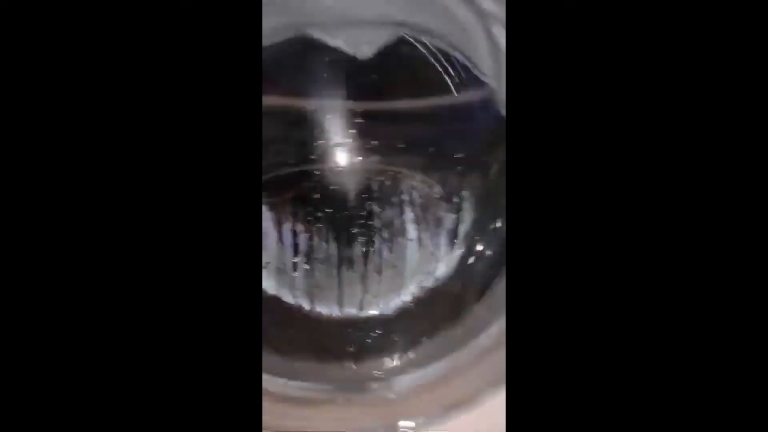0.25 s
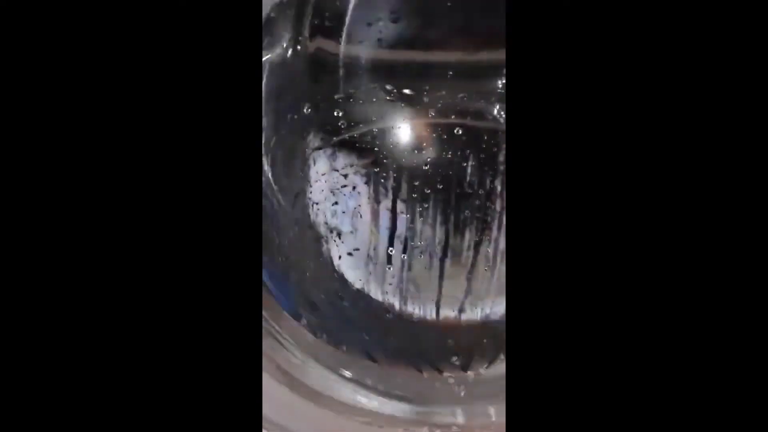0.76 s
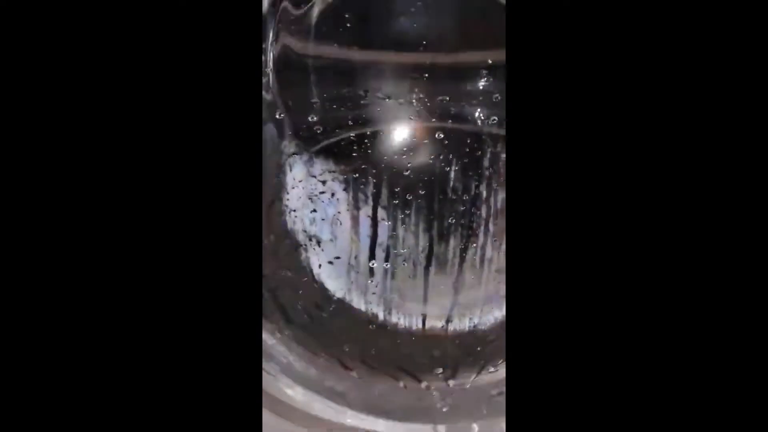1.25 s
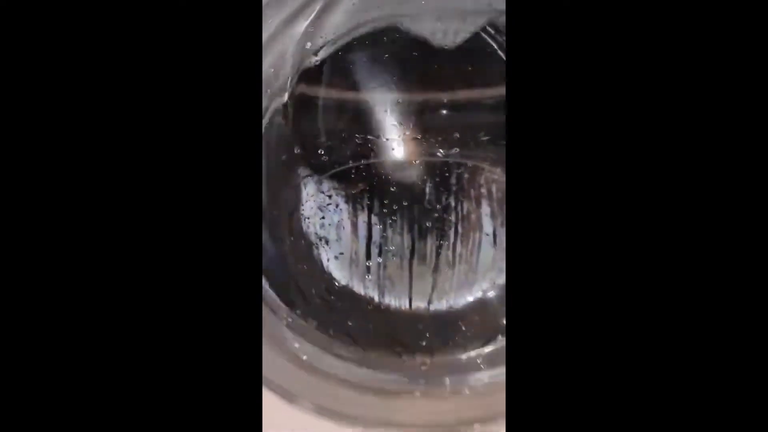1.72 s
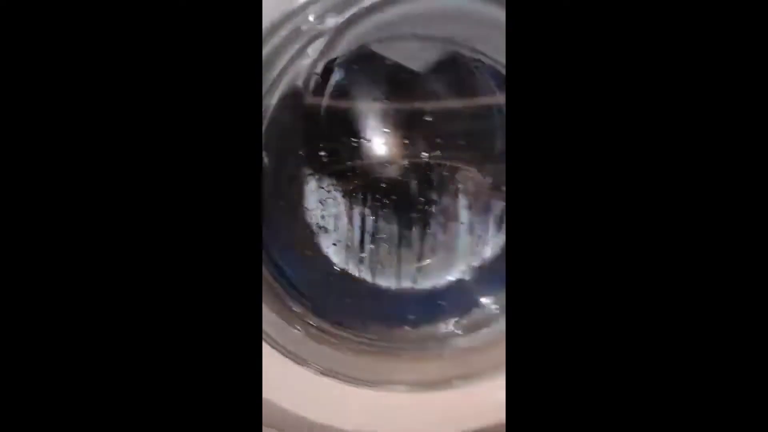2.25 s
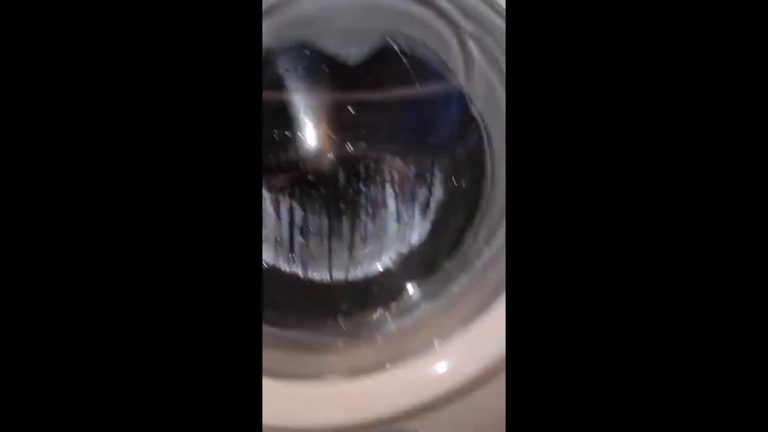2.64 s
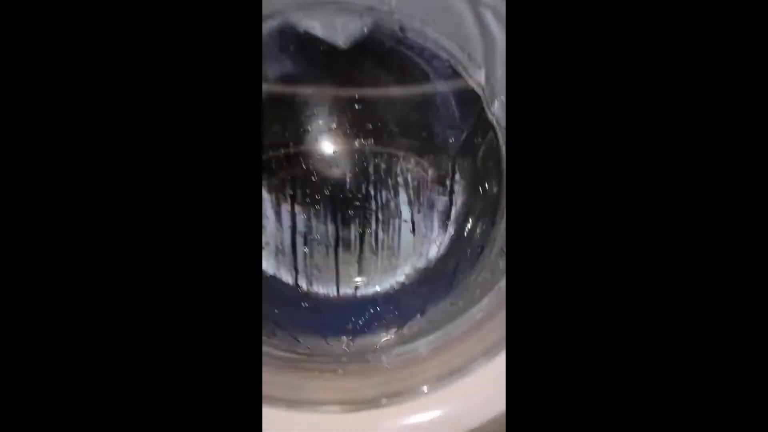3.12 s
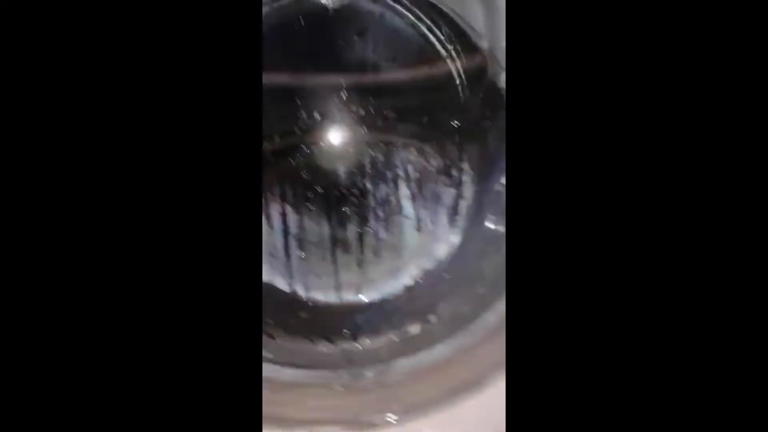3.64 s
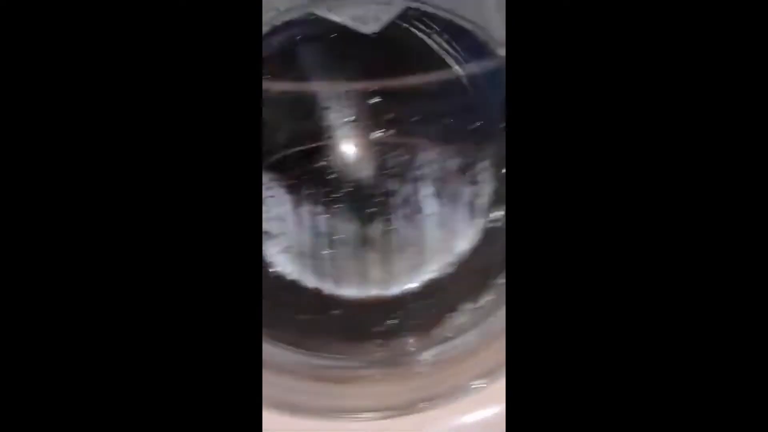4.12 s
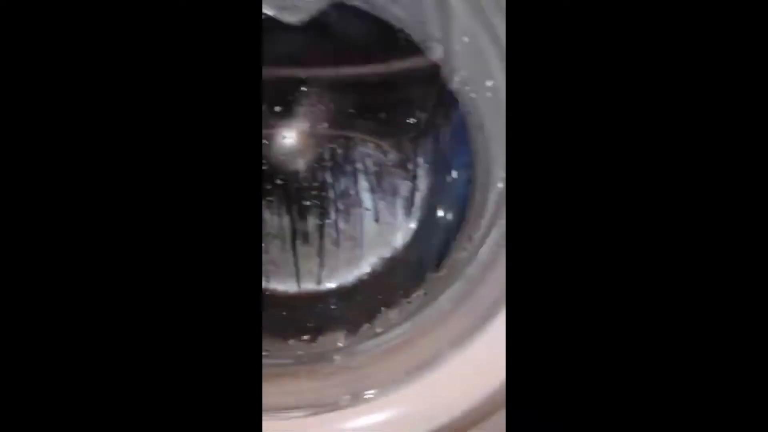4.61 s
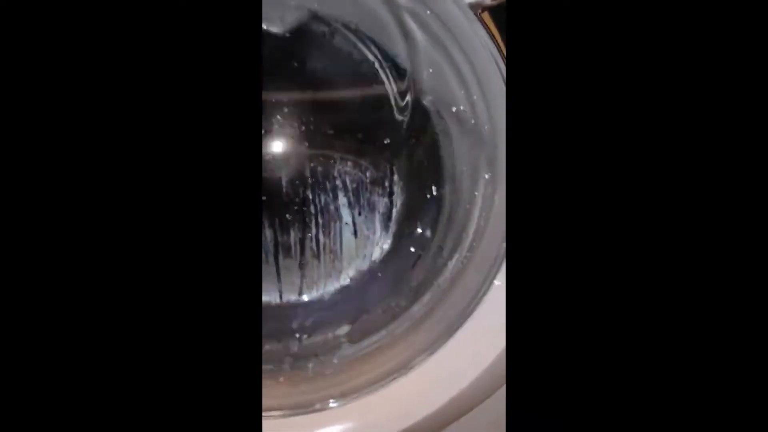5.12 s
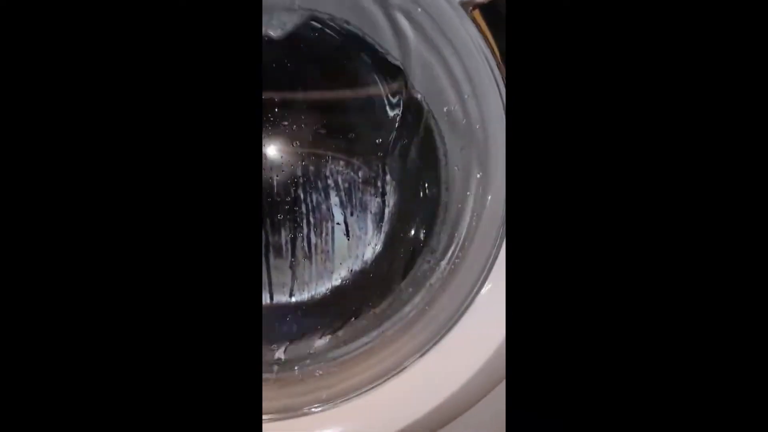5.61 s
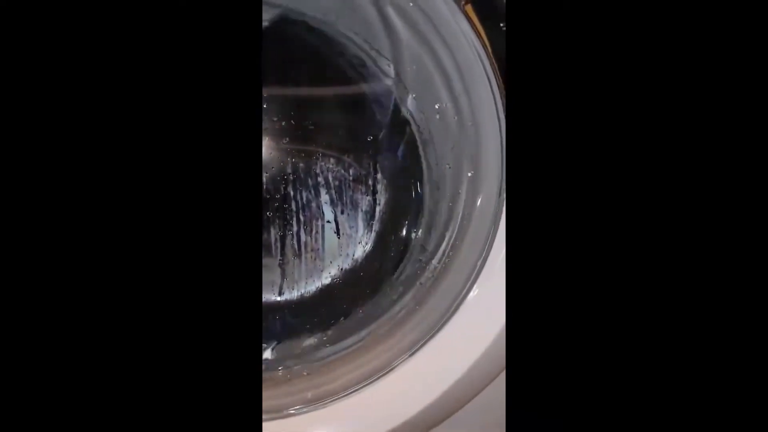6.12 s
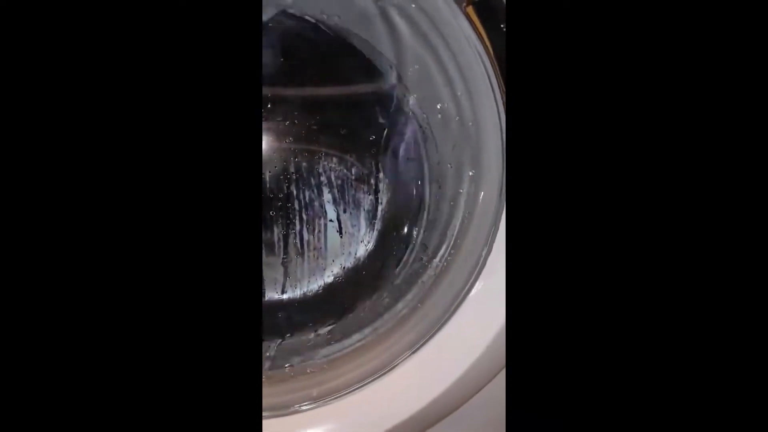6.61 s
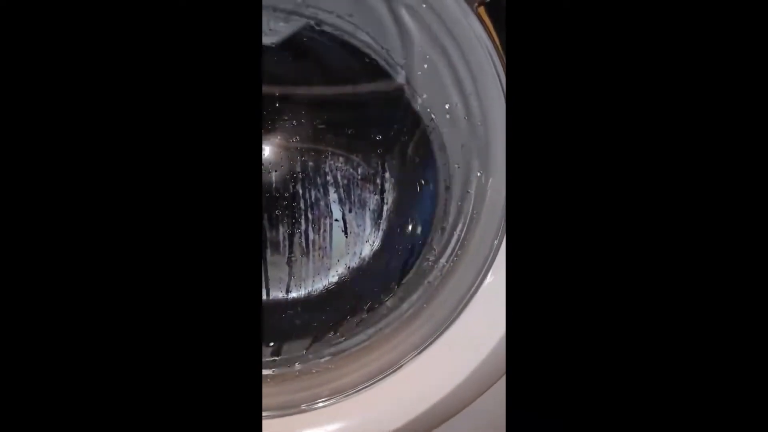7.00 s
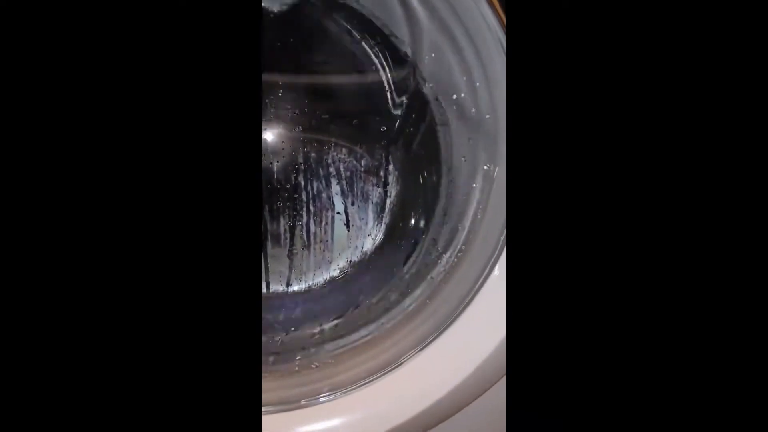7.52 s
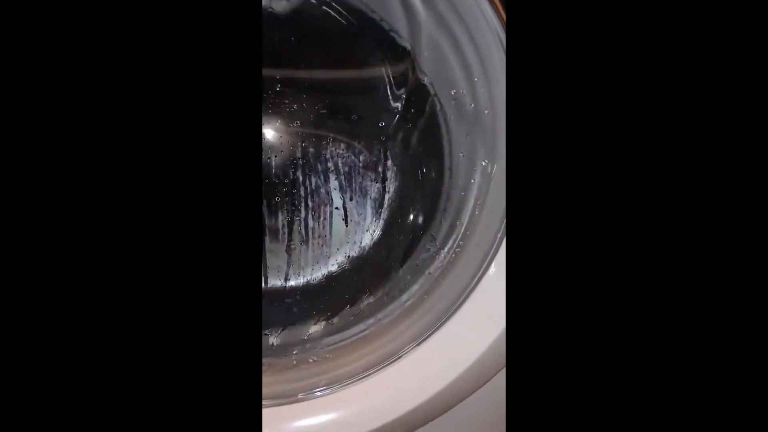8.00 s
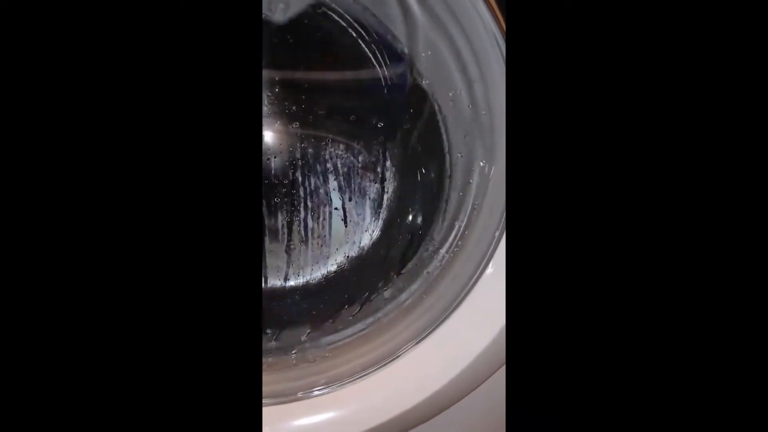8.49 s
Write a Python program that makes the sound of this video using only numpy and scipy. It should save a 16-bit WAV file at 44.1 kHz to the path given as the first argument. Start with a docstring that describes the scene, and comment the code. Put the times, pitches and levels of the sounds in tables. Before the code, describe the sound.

A lopsided load makes a spinning washing machine pound its cabinet in a fast, regular gallop, already running at the start and never slowing. Hollow metal booming dominates; behind it a thin, high motor whine trembles and shifts between left and right as the nearby phone moves, with steady air hiss and loose-panel rattle. Several soft bumps on the phone case come near three seconds. Short indoor echoes.

```python
"""A washing machine spins with an unbalanced load, close to a hand-held phone with two microphone ports.
Each drum turn repeats the same run of knocks, bands of force that ring the cabinet modes.
The belt-driven motor slows under the lump: a sum of sines whose pitch wavers once a turn, with wall echoes.
A few dull thuds on the phone's case are short swells of a low cosine.
Behind them lie shaped noises: hiss of air and brushes, panel rattle and tub rumble."""
import sys
import numpy as np
from scipy import signal
from scipy.fft import rfft, irfft, next_fast_len
from scipy.io import wavfile
from scipy.ndimage import map_coordinates

SR = 44100
rng = np.random.default_rng(int(sys.argv[2]) if len(sys.argv) > 2 else 0)


def generate_wav(signal):
    """Clip the signal to [-1, 1] and save it as 16-bit WAV at the path in sys.argv[1]."""
    frames = np.transpose(np.atleast_2d(signal))
    scaled = np.clip(frames, -1, 1) * 32767
    pcm = np.round(scaled).astype(np.int16)
    wavfile.write(sys.argv[1], SR, pcm)


def magnitude_from_level(level_db):
    """Linear magnitude for a level in decibels (20 dB per decade)."""
    exponent = np.asarray(level_db, float) / 20
    return 10 ** exponent


N = 385875  # samples

TURN_S = .149719  # one drum turn
MARK_S = .0743  # reference mark of the first turn, from which lags within a turn are counted
WHINE_HZ = 2618  # first order of the commutator whine, before it wavers
LEFT_LAG_MS = 0.25  # the left port is farther from the cabinet

# Contacts within one turn: [t/ms after the mark, relative level/dB, centre f/Hz]
KNOCKS = [(-20.0, -7.5, 516), (-14.5, -18, 700), (-12, -1.28, 197.6), (-4.0, -2.5, 212.4), (4, -7, 386),
          (9, -16, 670), (15, -8.5, 115.5), (22, -12.5, 147), (31, -14, 636), (40, -11, 192),
          (48, -11, 174), (52.5, -17.5, 820), (55, -14.0, 443), (62.5, -13.5, 1500), (66.5, -16.5, 171),
          (72.5, -16.5, 400), (77, -18, 2100), (87, -15.5, 326), (95, -11.5, 210), (102.5, -12, 420),
          (110.5, -8, 183), (119, -9.5, 178)]
# Cabinet and tub modes: [f/Hz, width/Hz, relative level/dB]
CABINET = [(57, 14.5, 15.5), (94.4, 7.5, 11.5), (123.4, 6.4, -1), (161.87, 7.33, 11), (192.1, 16.7, 12.5),
           (203.3, 41, 2.4), (288.4, 9.6, 9.5), (324.6, 9.54, 9.5), (404, 73, -16), (486, 6.3, -19),
           (545, 5, -16), (635.4, 18, -7.5), (671, 26.4, -4), (726, 36.5, -4), (843.4, 25.6, -3),
           (950, 31, -5.5)]
# Room share of the knocks against their direct sound: [f/Hz, level/dB]
ROOM_SHARE = [(60, -10), (150, -43), (300, -21), (500, -1.5), (1000, -1)]
# Nearness of the phone: [t/s, knocking level/dB, hiss level/dB, left-right level of the knocks/dB]
NEAR = [(0, -.5, -29, -1.5), (1, -0.5, -28.5, -0.5), (3, -1, -28.5, -1), (4.3, 0, -28.5, -1),
        (5.3, -0.5, -30, -1), (8.75, 0, -29.5, -1)]
# First whine order as the phone moves: [t/s, left port level/dB, right port level/dB]
WHINE = [(0, -37, -29), (.2, -35, -30), (.42, -48, -31.5), (.6, -31.5, -35), (1.3, -33, -37),
         (1.5, -27, -36), (1.67, -31, -24), (1.9, -29, -42), (2.33, -26, -36.5), (2.6, -38, -30),
         (2.9, -36, -39), (3.1, -29, -35.5), (3.6, -37, -33), (4.15, -35.5, -32), (4.38, -43, -31),
         (4.8, -33, -34), (5.8, -33, -31.5), (7.6, -31.5, -33.5), (8.75, -30, -33.5)]
# Higher whine orders, base levels: [multiple of the first, left port level/dB, right port level/dB]
OVERTONES = [(1.5, -59, -61), (2, -32, -34.5), (2.513, -56, -41), (2.999, -36, -33.5), (4, -46, -44),
             (5, -45, -48)]
# Wall echoes of the whine: [t/ms late at the left port, t/ms late at the right port, level/dB]
WALLS = [(9, 16.5, -10), (20.5, 19.3, -7.5), (34.7, 47.4, -8.5), (53.5, 52.6, -14.5), (81, 72, -6)]
# How much the hand sways: [t/s, echo phase/rad]
SWAY = [(0, 2.44), (4.8, 1.57), (5.6, 0.35), (8.75, 0.43)]
# Thuds on the case: [t/s, nominal peak level/dB, f/Hz, left-right level/dB]
THUDS = [(2.091, -10.5, 130, -2.5), (2.85, -9.5, 127, -3.5), (2.932, -13, 129, -3), (2.986, -12, 121, -3),
         (3.031, -12, 127, -3), (3.1, -11.5, 117, -4), (3.136, -18, 66, -2), (4.871, -24, 125, 0)]
# Spectrum of the air and brush hiss: [f/Hz, relative level/dB]
HISS = [(900, -31), (1300, -23.5), (2200, -11.5), (2750, -14), (3050, -15.5), (3900, -13.5), (4800, -18.5),
        (5400, -8.5), (6900, -7), (7900, -8.5), (10500, -11.5), (13200, -21), (15700, -18)]
# Spectrum of the loose panels: [f/Hz, relative level/dB]
RATTLE = [(300, -6.5), (450, -3), (580, -5.5), (680, -0.5), (950, -4), (1150, -7.5), (2000, -11.5),
          (2600, -29)]
# Spectrum of the tub: [f/Hz, relative level/dB]
RUMBLE = [(15, -49), (25, -16), (60, -4.5), (102, -8), (158, 0.5), (253, -8), (328, -13.5), (419, -21),
          (800, -54)]
# Likeness of the noises at the two ports: [f/Hz, left-right correlation]
ALIKE = [(60, 0.99), (300, 1), (500, -0.028), (1200, -0.033)]
# Unequal response of the two ports: [f/Hz, left-right level/dB]
PORTS = [(100, -1.5), (400, 1.5), (800, -2), (1500, -0.5), (5000, -1.5), (13000, 1.5)]


def unit(x):
    """Scale to rms 1."""
    return x / np.sqrt(np.mean(x ** 2) + 1e-20)


def along(points, hz):
    """Read (f/Hz, value) points on a log frequency axis."""
    f, value = np.transpose(points)
    return np.interp(np.log(hz + 1), np.log(f + 1), value)


def curves(rows):
    """One value per sample for each column after the time."""
    s, *columns = np.transpose(rows)
    return [np.interp(np.arange(N) / SR, s, column) for column in columns]


def wobble(rate):
    """A smooth random curve, rate knots a second."""
    knots = rng.standard_normal(int(N * rate / SR) + 4)
    return map_coordinates(knots, [np.arange(N) * rate / SR])


def filtered(x, response):
    """Multiply the spectrum of x by a complex response of frequency."""
    size = next_fast_len(x.shape[-1] + SR)
    hz = np.fft.rfftfreq(size, 1 / SR) + 1e-6
    return irfft(rfft(x, size) * response(hz), size)[..., :x.shape[-1]]


def panned(x, pan_db):
    """Spread over two channels by a level difference."""
    return x * magnitude_from_level(np.array([pan_db / 2, -pan_db / 2]))


def swing(lag_ms, times=1):
    """A cosine locked to the drum, times peaks a turn, one of them lag_ms after the mark."""
    since_mark = np.arange(N) / SR - MARK_S - lag_ms / 1000
    return np.cos(2 * np.pi * times * since_mark / TURN_S)


def knocking(jitter_ms=0.04, scatter_db=0.2, octaves=0.71, level_db=33, moves=1.212):
    """The same contacts come round each turn, a little early or late, and ring the cabinet and the room."""
    turns = np.arange(-6, N / SR / TURN_S + 1)
    size = next_fast_len(N + 2 * SR)
    f = np.fft.rfftfreq(size, 1 / SR)[1:size // 10]  # only the lowest fifth of the spectrum
    force = 0
    for ms, db, centre_hz in KNOCKS:
        chance = rng.standard_normal((len(turns), 2))
        late_ms = ms + jitter_ms * chance[:, 0]
        at = 1 + MARK_S + turns * TURN_S + late_ms / 1000  # one second of run-in
        blows = np.bincount(np.round(at * SR).astype(int), magnitude_from_level(db + scatter_db * chance[:, 1]), size)
        # a soft contact pushes only a band around its centre
        band = np.exp(-.5 * (np.log2(f / centre_hz) / octaves) ** 2)
        force += rfft(blows)[1:len(f) + 1] * band

    modes = 0
    for k, (centre, width, db) in enumerate(CABINET):
        resonance = 1j * f * width / (centre * centre - f * f + 1j * f * width)
        modes = modes + (-1) ** k * magnitude_from_level(db) * resonance  # neighbours push opposite ways
    direct = magnitude_from_level(level_db) * force * modes

    # the room's answer differs between the ports, varies with frequency and changes as the phone moves
    tail_t = np.arange(SR // 10) / SR
    tails = rng.standard_normal((4, SR // 10)) * magnitude_from_level(-60 * tail_t / 0.18)  # 60 dB of decay in 0.18 s
    rooms = rfft(tails / np.linalg.norm(tails[0]), size)[:, 1:len(f) + 1]
    answers = direct * rooms * magnitude_from_level(along(ROOM_SHARE, f))
    spectra = np.pad([direct, *answers], [(0, 0), (1, 0)])
    mid, *answers = irfft(spectra, size)[:, SR:SR + N]
    share = np.array([wobble(moves) for _ in answers])
    side = np.sum(share * answers, 0) / np.linalg.norm(share, axis=0)
    return np.array([mid + side, mid - side])


def motor(slip=.006, drift=.0005, flutter=.0015, load_db=2.2, rough_db=.9, fading_db=1.3, dull_db=.7):
    """The whine drops in pitch and grows as the lump is lifted; echoes carry an older pitch and beat with it."""
    speed = 1 - slip * swing(30.2) + drift * wobble(25) + flutter * wobble(220)
    phase = 2 * np.pi * np.cumsum(WHINE_HZ * speed) / SR
    sway, = curves(SWAY)
    _, hiss_db, _ = curves(NEAR)
    farther = 2 * (hiss_db.max() - hiss_db)  # orders above the third fade as the phone draws back
    now = np.arange(N)
    steady = phase[-1] * now / N

    def older(ms):
        """An echo lags only in the wavering part of the phase; the steady part keeps its time."""
        return np.interp(now - ms * SR / 1000, now, phase - steady) + steady

    paths = [(0, np.array([phase + np.pi / 4, phase - np.pi / 4]))]  # the direct path
    for left_ms, right_ms, db in WALLS:
        # the hand's sway slowly turns the phase of each echo
        angles = [older(ms) + rng.uniform(0, 2 * np.pi) + sway * wobble(2.5) for ms in (left_ms, right_ms)]
        paths.append((db, angles))

    out = np.zeros((2, N))
    for k, *ports_db in [(1, *curves(WHINE))] + OVERTONES:
        tone = unit(sum(magnitude_from_level(path_db) * np.sin(k * np.array(angle)) for path_db, angle in paths))
        level_db = np.reshape(ports_db, (2, -1)) - dull_db * max(k - 3, 0) * farther
        level_db = level_db + load_db / k * swing(38)
        level_db = level_db + rough_db * wobble(45) + fading_db * sway * wobble(9)
        out += magnitude_from_level(level_db) * tone
    return out


def thuds(rise_cycles=0.62, fall_cycles=1.3):
    """Short low bumps of the case against the hand: a few cycles that swell fast and die more slowly."""
    out, t = np.zeros((2, N)), np.arange(N) / SR
    for s, db, hz, pan_db in THUDS:
        cycles = hz * (t - s)
        spread = np.where(cycles < -.3, rise_cycles, fall_cycles)
        swell = np.exp(-.5 * ((cycles + 0.36) / spread) ** 2)
        bump = magnitude_from_level(db) * swell * -np.cos(2 * np.pi * cycles)
        out += panned(bump, np.full(1, pan_db))
    return out


def rush(spectrum):
    """Stereo noise of rms 1, alike in the bass: mid and side share the power by the correlation."""
    def mid_side(hz):
        angle = np.arccos(np.clip(along(ALIKE, hz), -1, 1)) / 2
        return magnitude_from_level(along(spectrum, hz)) * [np.cos(angle), np.sin(angle)]

    mid, side = filtered(rng.standard_normal((2, N)), mid_side)
    return unit(np.array([mid + side, mid - side]))


def air():
    """Hiss of fan and brushes, panel rattle and tub rumble: shaped noises that breathe with the turn."""
    _, hiss_db, _ = curves(NEAR)
    brushes_db = 0.39 * np.sin(2 * np.pi * WHINE_HZ / 18 * np.arange(N) / SR)  # once per motor turn
    hiss_db = hiss_db + 0.31 * swing(5.1) + 0.56 * wobble(16) + brushes_db
    hiss = magnitude_from_level(hiss_db) * rush(HISS)
    # the panels are shaken mostly twice a turn
    rattle_db = -33.0 + 0.99 * swing(13) + 2.0 * swing(-19.0, times=2) + 0.32 * wobble(9)
    rattle = magnitude_from_level(rattle_db) * rush(RATTLE)
    rumble_db = -35.5 + 2 * swing(8.5) + 0.52 * wobble(5.6)
    rumble = magnitude_from_level(rumble_db) * rush(RUMBLE)
    return hiss * magnitude_from_level([[.5], [-.5]]) + rattle * magnitude_from_level([[-1.9], [1.9]]) + rumble


def scene():
    """Knocking follows the phone's position and reaches the left port later; the rest adds."""
    knock_db, _, pan_db = curves(NEAR)
    left, right = panned(magnitude_from_level(knock_db) * knocking(), pan_db)
    left = np.interp(np.arange(N) - LEFT_LAG_MS * SR / 1000, np.arange(N), left)
    return np.array([left, right]) + motor() + thuds() + air()


def roll_off(x):
    """The treble ends steeply here."""
    return signal.sosfilt(signal.butter(12, 15870, fs=SR, output="sos"), x)


def record(dry):
    """The microphone drops the deepest bass and its two ports colour the sound unequally."""
    def microphone(hz):
        bass_cut = (1j * hz / (32 + 1j * hz)) ** 2  # two first-order high-passes at 32 Hz
        return bass_cut * magnitude_from_level(np.outer([.5, -.5], along(PORTS, hz)))

    mix = filtered(dry, microphone)
    return roll_off(mix)


dry = scene()
out = record(dry)
generate_wav(out)
```